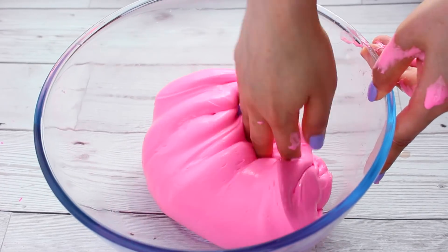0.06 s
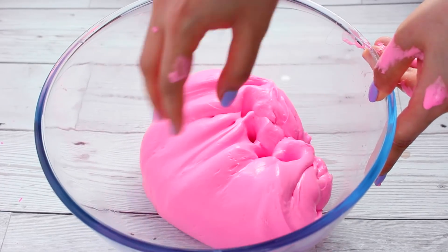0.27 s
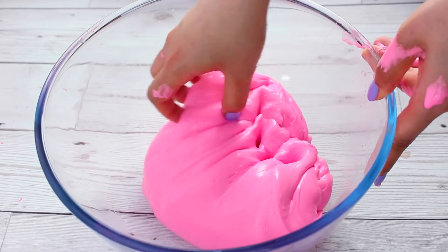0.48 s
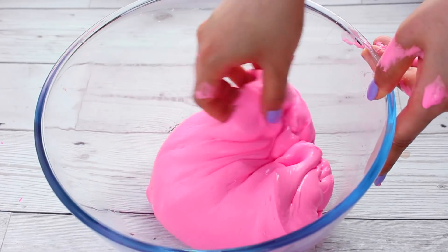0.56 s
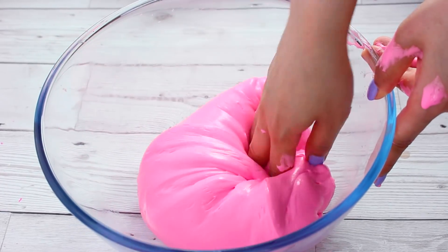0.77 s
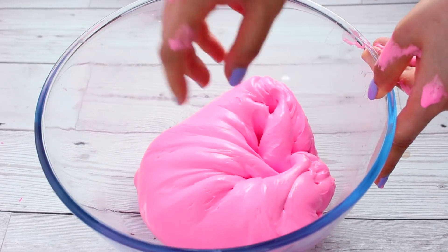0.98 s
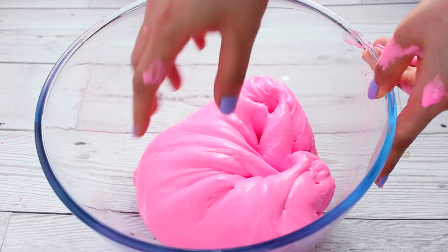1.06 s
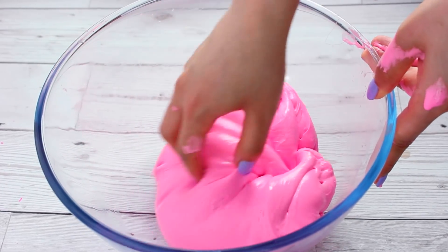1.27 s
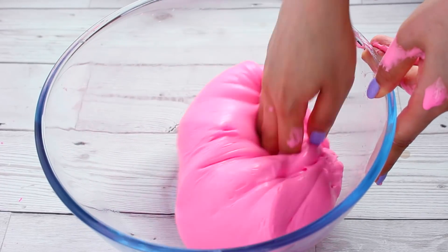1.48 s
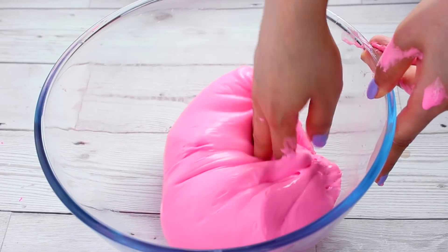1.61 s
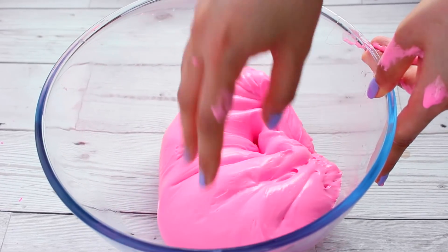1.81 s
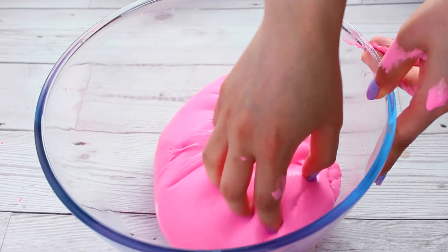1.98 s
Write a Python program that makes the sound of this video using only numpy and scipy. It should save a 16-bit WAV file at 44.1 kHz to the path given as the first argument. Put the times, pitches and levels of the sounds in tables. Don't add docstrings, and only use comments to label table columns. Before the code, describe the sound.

Close up in a small room with a faint low hum, slime bursts in three crisp, overloaded pops under pulling fingers, separated by quiet wet squelches, stretchy crackling and tiny ticks; the last pop carries a glassy knock.

```python
import sys
import numpy as np
from scipy import signal
from scipy.fft import rfft, irfft
from scipy.io import wavfile
from scipy.ndimage import uniform_filter1d

SR = 44100
rng = np.random.default_rng(int(sys.argv[2]) if len(sys.argv) > 2 else 0)


def wrap_up_sound(samples):
    columns = np.atleast_2d(samples).T
    tamed = np.clip(columns, -1, 1)
    steps = np.round(tamed * 32767).astype(np.int16)
    wavfile.write(sys.argv[1], SR, steps)


def elevation(decibels):
    levels = np.asarray(decibels, float)
    return 10 ** (levels / 20)


N = 90404


def noise(shape=N):
    return rng.standard_normal(shape)


def unit(x):
    return x / np.sqrt(np.mean(x ** 2))


def coloured(x, curve):
    curve_hz, curve_db = np.array(curve).T
    hz = np.fft.rfftfreq(len(x), 1 / SR)
    gain = elevation(np.interp(np.log(hz + 1), np.log(curve_hz), curve_db))
    return irfft(rfft(x) * gain, len(x))


def resonant(x, hz, q):
    return signal.lfilter(*signal.iirpeak(hz, q, fs=SR), x)


def walk(rate_hz):
    width = int(SR / rate_hz)
    return unit(uniform_filter1d(uniform_filter1d(noise(), width), width))


def swell(rows):
    t = np.arange(N) / SR
    return sum(elevation(db) * np.clip(1 - ((t - middle) / half) ** 2, 0, 1) ** 1.6 for middle, half, db in rows)


def add(out, start_s, sound):
    i = int(start_s * SR)
    out[i:i + len(sound)] += sound[:N - i]


def decay(t, t60):
    return 1000. ** (-t / t60)


# hz [Hz], level_db [dB per Hz]
AIR_SPECTRUM = [(15, -51), (25, -24), (102, -3), (127, -20), (293, -10), (439, -13.5), (545, -15),
                (695, -23), (16000, -38.5)]
# pitch_hz [Hz], level_db [dB], width_hz [Hz]
HUM_BANDS = [(55.5, -60, 10), (97.5, -52, 6), (192, -57.5, 24), (292.3, -61, 16), (345, -62, 36)]


def background():
    out = elevation(-56 + 1.7 * walk(9.2)) * unit(coloured(noise(), AIR_SPECTRUM))
    for hz, db, width_hz in HUM_BANDS:
        out = out + elevation(db) * unit(resonant(noise(), hz, hz / width_hz))
    return out


# middle_s [s], half_length_s [s], level_db [dB]
STRETCHES = [(.07, 0.12, -60), (0.208, .03, -61.5), (0.539, 0.055, -56), (0.66, 0.12, -49),
             (.79, 0.05, -63), (.86, .025, -56), (.922, 0.013, -54.5), (.224, .009, -52),
             (0.975, 0.049, -48), (1.333, 0.049, -63), (1.452, 0.093, -45.5), (1.634, 0.051, -57.5),
             (1.943, 0.044, -58)]
# hz [Hz], level_db [dB per Hz]
CRACKLE_SPECTRUM = [(300, -34), (600, -5.5), (1100, -3.5), (1600, -7.5), (3000, -2.5), (5000, -10.5),
                    (9000, -14), (16000, -14.5)]


def crackle():
    clicks_per_s, spread_db, tail_ms, fizz_db = 650, 3.1, .2, -3.5
    chance = rng.random((2, N))
    torn = chance[0] < clicks_per_s / SR * elevation(3.5 * walk(40))
    clicks = torn * elevation(-spread_db * np.log(chance[1] + .01))
    tails = signal.lfilter([1], [1, -np.exp(-1000 / (tail_ms * SR))], clicks)
    grain = unit(tails * noise())
    fizz = elevation(fizz_db + 4.9 * walk(25)) * noise()
    return unit(coloured(grain + fizz, CRACKLE_SPECTRUM)) * swell(STRETCHES)


def pocket(db, hz, t60_ms, click_db):
    t = np.arange(2048) / SR
    _, breath, rip = noise((3, len(t)))
    sag_per_s, mode_spread, cavity_q = 2.3, .09, 4
    tones = hz * np.exp(mode_spread * np.array([[-1], [.2], [1]]))
    modes = -np.sin(2 * np.pi * tones * t * (1 - sag_per_s * t)).sum(axis=0) / 2
    rasp = unit(resonant(breath, hz, cavity_q))
    click = .5 * rip * np.exp(-t / 0.00015)
    click[:2] = -1, .5
    attack = 1 - np.exp(-t * hz / 0.37)
    return elevation(db) * (modes + 0.69 * rasp) * attack * decay(t, t60_ms / 1000) + elevation(click_db) * click


# start_s [s], level_db [dB peak], pitch_hz [Hz], click_db [dB]
STICKY_TICKS = [(0.0296, -42.5, 1210, -32), (0.083, -41, 2200, -50), (0.1957, -37, 2300, -44),
                (0.219, -44, 9000, -39), (0.8393, -37.5, 3000, -45), (.784, -46, 1700, -46),
                (1.358, -44, 2000, -58), (1.403, -42, 3000, -40), (1.484, -44.5, 3000, -40),
                (1.462, -50, 7000, -42), (.124, -59, 5000, -46), (0.487, -45, 1165, -34),
                (0.5075, -37, 1100, -46.5), (0.5322, -40.5, 2600, -38), (0.552, -41.5, 2300, -45),
                (.553, -37, 4600, -50), (0.57, -60, 9000, -42), (0.632, -34, 1130, -33),
                (0.7205, -40, 1490, -32), (0.737, -67, 5000, -43), (.8985, -62.5, 7500, -58),
                (0.946, -40, 2200, -43.5), (1.298, -39.5, 1100, -50), (1.299, -44, 1900, -55),
                (1.3145, -40.5, 1780, -35), (1.324, -41.5, 2060, -38), (1.3786, -39, 2640, -36),
                (1.4117, -40, 1000, -21), (1.532, -54, 3740, -40), (1.54, -49, 2880, -33),
                (1.599, -37, 1180, -45), (1.612, -39.5, 3050, -29.5), (1.646, -39, 1122, -46)]


def ticks():
    out = np.zeros(N)
    for s, db, hz, click_db in STICKY_TICKS:
        add(out, s, pocket(db, hz, 14, click_db))
    return out


# middle_s [s], half_length_s [s], level_db [dB]
ROCKS = [
    (.12, 0.088, -50),
    (1.45, .09, -48.5),
]


def rocking():
    pitch_hz = 53 * (1 + 0.1 * walk(14))
    return np.sin(2 * np.pi * np.cumsum(pitch_hz) / SR) * swell(ROCKS)


def ring(hz, t60, db, rise=0.18):
    t = np.arange(int(t60 * SR) + 8) / SR
    return -elevation(db) * np.sin(2 * np.pi * hz * t) * decay(t, t60) * (1 - np.exp(-t * hz / rise))


# start_s [s], level_db [dB peak], pitch_hz [Hz], t60_s [s]
NAIL_PINGS = [
    (0.069, -65, 6100, 1),
    (0.078, -61, 4200, .6),
    (.488, -51, 3510, 0.039),
    (0.508, -45.5, 3200, 0.074),
    (0.5072, -47.5, 7800, 0.066),
    (.5075, -57, 8200, 0.11),
    (1.7, -57, 7760, 0.12),
    (1.323, -60, 7400, .08),
    (1.754, -28.5, 2700, 0.14),
    (1.755, -34, 5800, 0.13),
]


def pings():
    out = np.zeros(N)
    for s, db, hz, t60 in NAIL_PINGS:
        add(out, s, ring(hz, t60, db, rise=1.4))
        add(out, s, ring(hz * 1.013, t60 * .7, db - 5, rise=3.))
    return out


# start_s [s], level_db [dB peak], pitch_hz [Hz], t60_ms [ms], click_db [dB]
BURSTS = [(0.2292, -12, 13000, 9, -13.5), (0.2295, -8.5, 10160, 9.3, -7), (0.23, -5.5, 7000, 7.6, -4),
          (0.2306, -9.5, 12700, 5, -10), (0.2323, -0.5, 2678, 7.6, -28), (0.235, -7, 2200, 14, -10.5),
          (0.2428, -2, 6550, 14, -0.5), (0.2432, -10, 10900, 5.5, -8.5), (0.2432, -3.5, 3814, 20, -13.5),
          (0.2534, -7, 8000, 6.6, -19), (.263, -25, 8000, 6, -29.5), (0.8512, -30.5, 5250, 9.9, -27.5),
          (0.9161, -35.5, 3630, 8.6, -19.5), (.9162, -24, 9600, 4.5, -22), (0.9596, -33, 2500, 9.9, -37),
          (.96, -40, 5500, 6, -45), (0.9729, -36, 2590, 11.1, -42), (.974, -40, 10000, 14, -44),
          (0.9857, -27.5, 3040, 20, -14), (.988, -30.5, 5500, 24, -28), (1.001, -9.5, 3200, 7.4, -9.5),
          (1.003, -2, 3262, 14, -1.5), (1.0034, -7.5, 5616, 16.2, -11.5), (1.004, -6.5, 7850, 8.1, -12.5),
          (1.009, -8, 3280, 8, -18.5), (1.016, -25, 3280, 13, -21), (1.737, -9, 3500, 9, -6.5),
          (1.7534, -4, 5765, 17.4, -3), (1.7537, -7.5, 4310, 11, -13.5), (1.7541, -0.5, 2750, 24, -18),
          (1.7535, -5.5, 7730, 7, -11), (1.7665, -19.5, 2730, 22, -27), (1.776, -18, 1220, 8.3, -25),
          (1.7805, -12, 6230, 7.1, -8.5), (1.7807, -12, 3500, 8.5, -16), (1.784, -21, 5000, 9, -28)]


def snaps():
    out = np.zeros(N)
    for s, db, hz, t60_ms, click_db in BURSTS:
        add(out, s, pocket(db, hz, t60_ms, click_db))
    return out


# start_s [s], level_db [dB peak], pitch_hz [Hz], t60_s [s]
CLOSING_HOLES = [(0.2316, -4.5, 186, 0.07), (.2354, 2, 587, 0.03), (.2356, 1, 290, 0.039),
                 (.2445, -7.5, 295, .04), (.2525, -6.5, 576, 0.03), (0.2613, -16.5, 245, .07),
                 (.233, -11.5, 1164, 0.041), (.2435, -12.5, 1415, 0.023), (0.2839, -1, 291, 0.15),
                 (0.2837, -6.5, 257, 0.11), (0.284, -12.5, 321, 0.084), (.285, -20, 110, 0.23),
                 (.285, -21, 167, 0.096), (.285, -9, 382, 0.024), (.285, -18, 598, 0.081),
                 (.8135, -32.5, 760, 0.011), (0.8398, -28.5, 1250, 0.0064), (.852, -30, 612, 0.025),
                 (.852, -31.5, 340, 0.037), (.962, -25.5, 245, 0.073), (0.9863, -16.5, 620, 0.016),
                 (1.001, -15.5, 575, 0.015), (1.0056, -12.5, 222.6, 0.072), (1.005, -19.5, 297.3, 0.099),
                 (1.005, -21.5, 136.4, 0.078), (1.737, -15, 637, 0.022), (1.754, -22.5, 316, 0.052),
                 (1.7547, -13.5, 1690, 0.016), (1.7802, -13.5, 620, 0.021), (1.7807, -21.5, 1100, .02),
                 (1.7801, -23, 259, 0.13), (1.781, -26, 97, 0.077), (.231, -25.5, 37.7, 0.12)]


def thuds():
    out = np.zeros(N)
    for s, db, hz, t60 in CLOSING_HOLES:
        add(out, s, ring(hz, t60, db))
    return out


# start_s [s], level_db [dB], pitch_hz [Hz], q [sharpness], t60_s [s]
HISSES = [
    (.236, -22, 3700, .9, 0.23),
    (.236, -27.5, 1492, 1.2, 0.23),
    (.236, -24.5, 6970, 2.05, 0.18),
    (1.003, -26, 3390, 2.8, 0.26),
    (1.003, -27.5, 6080, 1.8, 0.19),
    (1.754, -27.5, 2750, 7.5, 0.25),
    (1.754, -32, 5740, 9, 0.24),
    (1.754, -35, 1950, 6.7, 0.26),
    (1.754, -29.5, 4560, 1.1, 0.24),
]


def wash():
    out, t = np.zeros(N), np.arange(SR // 3) / SR
    for s, db, hz, q, t60 in HISSES:
        hiss = unit(resonant(resonant(noise(len(t)), hz, q), hz, q))
        add(out, s, elevation(db) * hiss * decay(t, t60) * (1 - np.exp(-t / 0.0027)))
    return out


# middle_s [s], half_length_s [s], level_db [dB]
SQUELCHES = [
    (.8, .026, -52),
    (0.615, 0.056, -56),
    (1.62, .03, -60.5),
    (1.6, 0.065, -59),
    (.975, .02, -47),
]


def squelch():
    hz, q = 1050, 1.3
    sputter = elevation(3.0 * walk(90)) * noise()
    return unit(resonant(resonant(sputter, hz, q), hz, q)) * swell(SQUELCHES)


# centre_hz [Hz], t60_s [s], level_db [dB]
ROOM_BANDS = [(165, 0.31, -27), (376, .23, -25), (620, 0.18, -30), (1100, 0.17, -23.5), (2200, 0.17, -28.5),
              (3500, 0.22, -33.5), (6000, 0.2, -34), (8500, 0.12, -35), (13000, .12, -37)]


def room(x):
    t, tail = np.arange(SR // 2) / SR, 0
    for hz, t60, db in ROOM_BANDS:
        edges = [hz / 1.414, min(hz * 1.327, 20000)]
        band = signal.sosfilt(signal.butter(2, edges, "band", fs=SR, output="sos"), noise(len(t)))
        tail = tail + elevation(db) * band * decay(t, t60)
    onset_ms = 1.8
    return signal.fftconvolve(x, tail * (1 - np.exp(-t * 1000 / onset_ms)) / 4)[:N]


def scene():
    hits = snaps() + ticks() + thuds() + pings() + wash()
    low_cut = signal.butter(2, 61.4, "high", fs=SR, output="sos")
    near = signal.sosfilt(low_cut, hits) + crackle() + rocking() + squelch()
    return (near + room(near) + background())[None]


def band_limit(x):
    return signal.sosfilt(signal.butter(12, 16990, fs=SR, output="sos"), x)


def record(dry):
    top_cut = signal.ellip(8, .2, 40, 15900, fs=SR, output="sos")
    cut = signal.sosfilt(top_cut, np.clip(dry, -1, 1))
    return band_limit(np.clip(cut, -1, 1))


dry = scene()
out = record(dry)
wrap_up_sound(out)
```